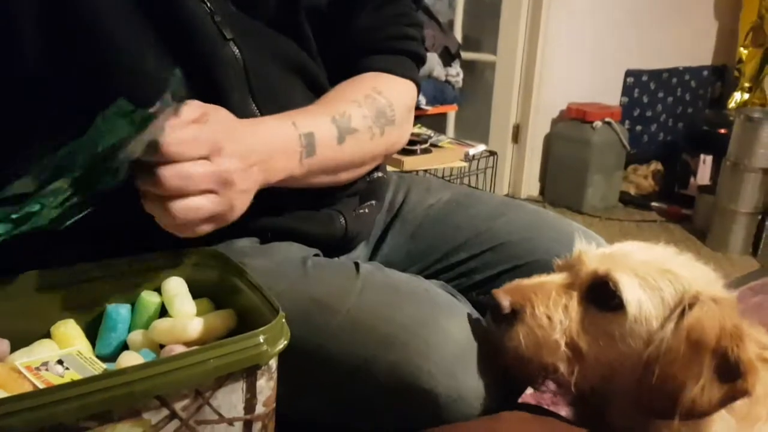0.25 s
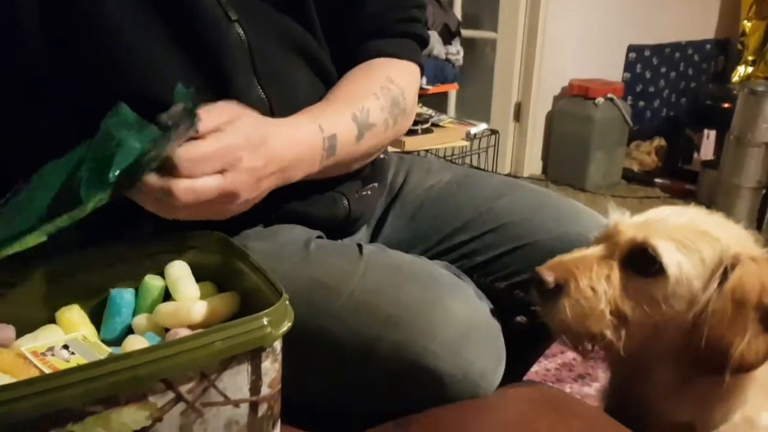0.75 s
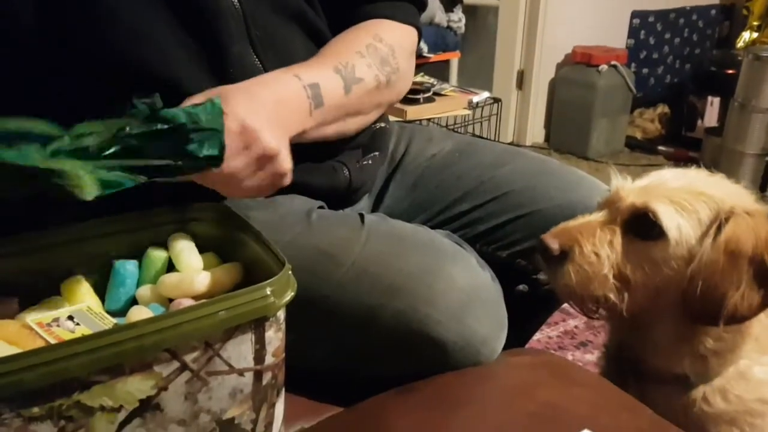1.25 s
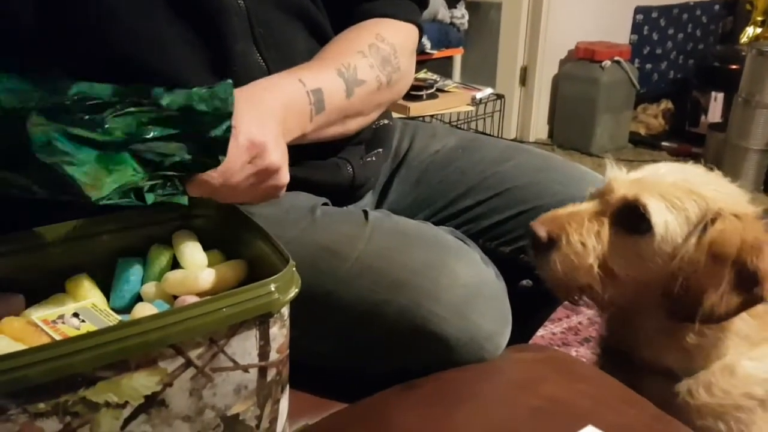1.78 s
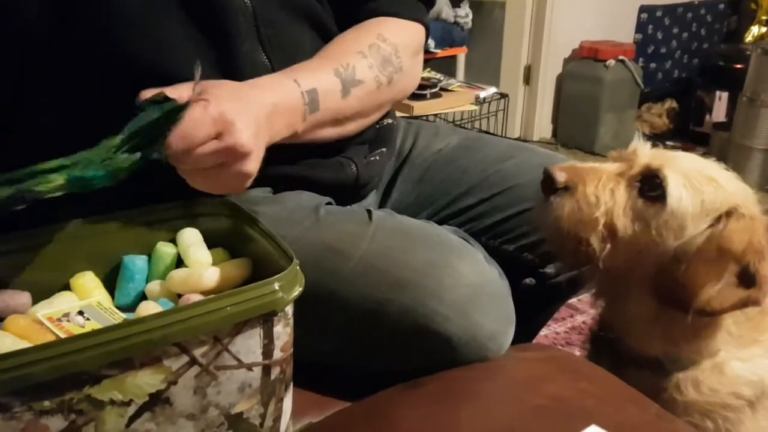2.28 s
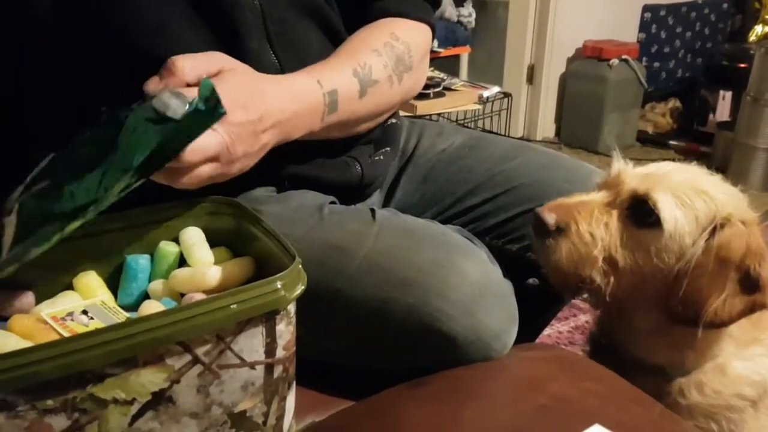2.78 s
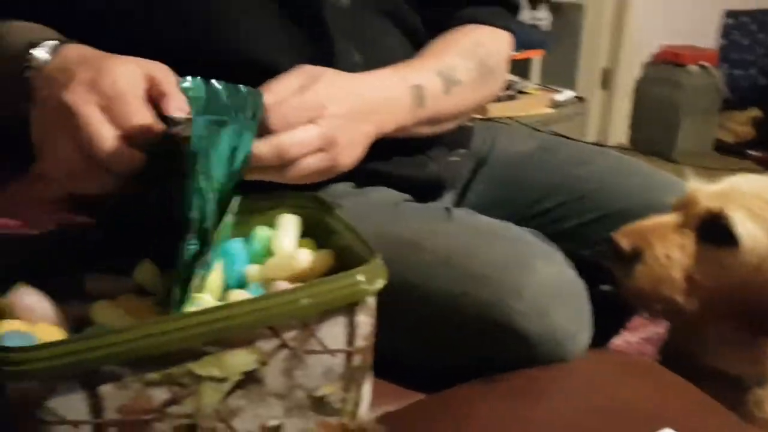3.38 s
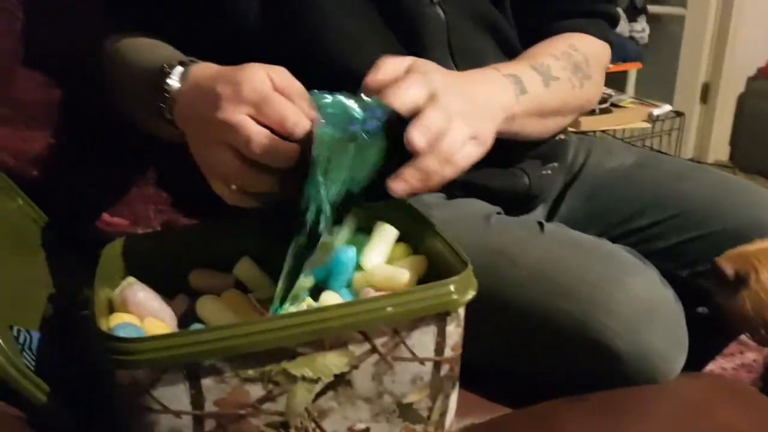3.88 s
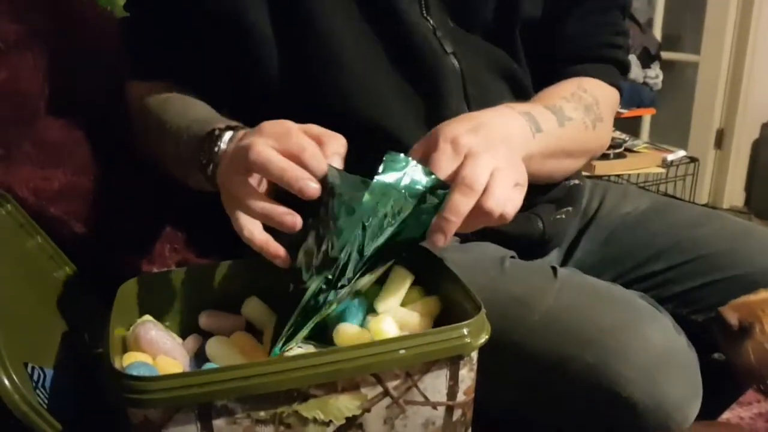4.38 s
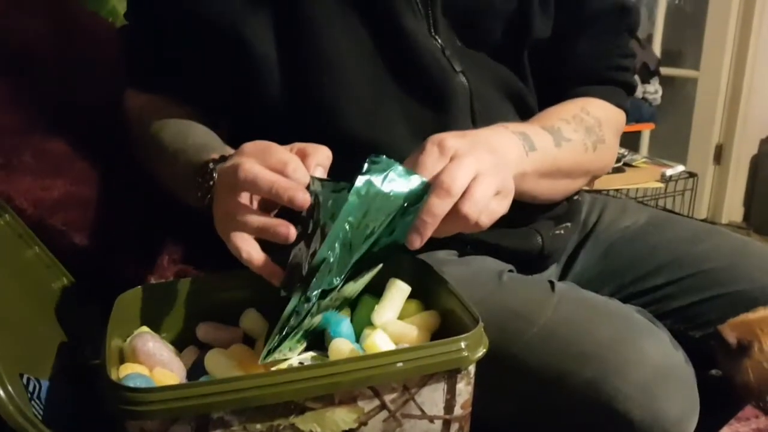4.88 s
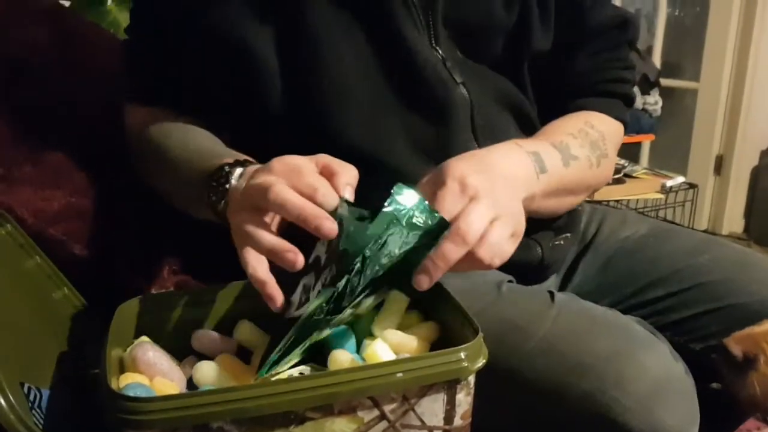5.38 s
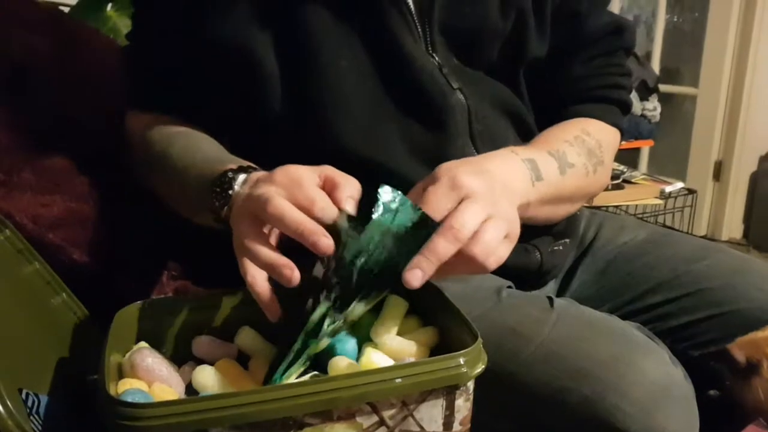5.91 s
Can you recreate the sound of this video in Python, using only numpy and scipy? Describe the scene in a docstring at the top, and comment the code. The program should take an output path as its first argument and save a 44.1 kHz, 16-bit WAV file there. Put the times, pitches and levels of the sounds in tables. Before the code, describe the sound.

Dry, bright foil crinkling, close and slightly left, in a furnished room with a short soft echo. Separate ticks and gaps lead to denser snapping and a hard, almost overloaded crack with a quick rub of foil. Clusters of crackles and soft puffs of pumped air continue, become sparse, then a fresh rustle closes it. The phone microphone adds only a faint hush.

```python
"""A foil bag is pulled open by hand, an arm's length from a two-port phone in a small furnished room.
It starts with small scattered snaps, builds to the loudest burst near 2.45 s, thins out from 4.7 s and
stirs again near 6 s. Each snap is a buckling crease that rings a patch of foil; aftershocks and crackle
fill the gaps, filtered noise makes the rubbing and pumped air, dull knocks ring the walls, and the room
answers with a short tail of decaying noise. A treble sheen and a faint low hush lie below."""
import sys
import numpy as np
from scipy import signal
from scipy.fft import rfft, irfft, next_fast_len
from scipy.io import wavfile
from scipy.ndimage import uniform_filter1d

SR = 44100
rng = np.random.default_rng(int(sys.argv[2]) if len(sys.argv) > 2 else 0)


def generate_wav(signal):
    """Clip the signal to [-1, 1] and save it as 16-bit WAV at the path in sys.argv[1]."""
    frames = np.transpose(np.atleast_2d(signal))
    scaled = np.clip(frames, -1, 1) * 32767
    pcm = np.round(scaled).astype(np.int16)
    wavfile.write(sys.argv[1], SR, pcm)


N = 271117  # length in samples

# All source levels are ahead of the microphone; colours hold their end values beyond the first and last Hz.
# Buckling creases. Each row: time in seconds, nominal peak in dB, patch pitch in Hz, relative treble
# in dB, sharpness of ring as Q (held to 0.5 or more).
SNAPS = [(0.121, -36.5, 3490, -13, 1.7), (0.1596, -32, 2460, -26, 2.4), (0.169, -36.5, 3000, -30, 2.7),
         (0.19, -26.5, 4450, 0, 2.5), (0.316, -37, 3530, -35, 5.5), (0.323, -40.5, 3970, -25, 2),
         (0.356, -34, 4870, -4, 6.3), (0.398, -39.5, 2480, -26, 2.9), (0.456, -27, 3850, -24, 0.62),
         (0.4745, -19, 9100, 3, 2.7), (0.504, -29.5, 5030, -13, 5.4), (0.529, -34.5, 4040, -9, 3.3),
         (0.5622, -30, 3420, -17, 0.6), (0.5715, -33.5, 4960, -9, 2), (0.746, -34.5, 4260, -46, 3.7),
         (0.7744, -24.5, 2060, -16.5, 1), (1.0971, -28, 2250, -22, 0.41), (1.1896, -25.5, 4770, -3, 1.4),
         (1.2438, -13, 4180, 2, 3.5), (1.327, -32.5, 3300, -24, 3.7), (1.337, -29.5, 3070, -17.5, 13),
         (1.3785, -26, 2850, -27, 0.77), (1.399, -31, 2650, -16, 3.5), (1.4587, -33, 3360, 2, 2.6),
         (1.4656, -23.5, 2860, -16, 3.1), (1.47, -38, 3300, -25, 4), (1.4798, -17, 2980, -31, 1.2),
         (1.5513, -37.5, 3500, -16, 8.2), (1.5988, -31.5, 3640, -10.5, 3.5), (1.6355, -32, 3230, -18, 5.7),
         (1.6819, -31, 2040, -23.5, 4.9), (1.721, -41, 2520, -26, 7.4), (1.7601, -23, 2600, -30, 15),
         (1.767, -17.5, 4960, -12, 2), (1.8257, -23.5, 2600, -17, 0.76), (1.964, -29, 5200, -6, 5.1),
         (2.015, -17.5, 3420, -16, 0.87), (2.0569, -25, 2700, -39, 9.3), (2.1005, -10.5, 5030, -19, 8.4),
         (2.114, -15.5, 4470, -11, 6.4), (2.1672, -23, 2350, -33.5, 3.4), (2.1781, -16.5, 2820, -16, 1.5),
         (2.205, -20, 5000, -17, 4.3), (2.2459, -25, 2330, -32, 8), (2.2698, -18.5, 2430, -15, 0.36),
         (2.32, -20, 5600, -8, 9), (2.3404, -47, 3430, -14.5, 3.2), (2.3669, -23.5, 2650, -16, 2.2),
         (2.413, -23, 3460, -12, 3.8), (2.42, -14, 3040, -7, 3.2), (2.4393, -3.5, 3530, -8, 0.6),
         (2.445, -7, 3470, -23, 2.4), (2.4522, 0, 5150, -14, 3.5), (2.461, 4, 3500, 0.5, 2),
         (2.4745, -7, 2363, -20, 6.2), (2.59, -24.5, 3300, -12, 3.4), (2.654, -31.5, 3440, -26, 0.68),
         (2.6922, -32, 2340, -8, 1.1), (2.7, -30.5, 2760, -39, 2.6), (2.7331, -23, 6000, -30, 42),
         (2.8748, -19.5, 3600, -8, 4.9), (2.9073, -17, 2600, -13.5, 1.7), (2.9944, -27, 5250.0, 13, 6.6),
         (3.0221, -26, 3830, -5, 6), (3.0421, -19.5, 3680, -5.5, 3), (3.071, -21, 2750, -6, 4.1),
         (3.0851, -22, 2250, -10, 0.58), (3.203, -39, 4560, -10, 2), (3.307, -33, 3100, -20, 0.46),
         (3.3433, -32, 1470, -30, 4.1), (3.37, -26, 1950, -9.5, 3.6), (3.387, -25, 2180, -12, 1.7),
         (3.4692, -28, 1500, -17.5, 0.39), (3.6109, -38, 810, -40.5, 1.5), (3.712, -34, 4230, -1, 4.9),
         (3.7459, -12.5, 4430, -5.5, 3.3), (3.8608, -22.5, 1910, -14, 5.3), (3.912, -15, 4000, -10, 6.8),
         (4.0354, -35.5, 3610, -35, 18), (4.0679, -23.5, 1420, -15, 0.72), (4.1452, -25.5, 507, -19.5, 12),
         (4.198, -35, 3900, -30, 3.5), (4.288, -13, 2020, -13.5, 5), (4.288, -18.5, 3980, -15.5, 4.8),
         (4.3569, -26.5, 2380, -36, 2.5), (4.3742, -20.5, 3280, -16, 1.3), (4.3874, -19, 1290, -44, 2.4),
         (4.3945, -17.5, 5030, -23, 1.6), (4.469, -33, 3100, -23, 2), (4.4856, -13.5, 3570, -5.5, 0.43),
         (4.494, -18.5, 3560, -11, 1.6), (4.569, -38, 3080, -16, 3), (4.688, -41, 800, -31, 1.5),
         (4.7032, -13.5, 3480, -10.5, 3.8), (4.994, -20, 5160, -1.5, 10), (5.0778, -34, 590, -21, 3.4),
         (5.1186, -36.5, 1310, -35, 3.4), (5.2751, -36, 4070, -5, 4.9), (5.463, -37, 2300, -28, 3),
         (5.5345, -22, 2570, -14.5, 0.41), (5.538, -34.5, 1700, -41, 1.9), (5.9065, -36.5, 2170, -27, 3.8),
         (5.961, -17.5, 3220, -26, 1.3), (5.9961, -14, 2110, -9, 4.8), (6.035, -13.5, 3750, -16, 0.87),
         (6.0587, -20, 3400, -38, 0.57), (6.084, -19, 2540, -11.5, 1.6), (6.1208, -29, 4200, -25, 7.7)]
# A snap sets off a weaker crease nearby: time scale in s, mean level re the snap and spread either way in dB.
AFTER_S, AFTER_DB, AFTER_SPREAD_DB = 0.016, -16, 5
GRAIN = 768  # samples in one crease sound
RARE = 0.015  # share of the very largest small creases that never happen

# Blows of the bag on hands and box. Each row: time in seconds, nominal peak in dB, pitch in Hz.
KNOCKS = [(0.156, -43, 423), (1.336, -43.5, 510), (1.632, -47.5, 670), (1.821, -35.5, 230),
          (1.834, -43, 650), (2.116, -31, 1160), (2.317, -34, 1090), (2.468, -37, 1100), (2.914, -37, 208),
          (3.085, -41.5, 288), (3.921, -30.5, 740), (4.143, -39.5, 464), (4.358, -36.5, 377),
          (4.376, -39.5, 313), (4.403, -39, 414), (4.593, -42, 680), (4.9, -52, 673), (4.95, -54, 650),
          (5.112, -45.5, 394), (5.176, -50.5, 444), (5.452, -45.5, 686), (5.492, -45, 596),
          (5.955, -34, 416), (5.993, -33.5, 870)]
# A snap of a 3 kHz patch jolts the walls this far below its own peak; small, high patches jolt them less.
JOLT_DB, JOLT_DB_PER_OCTAVE = -24.5, -4
JOLT_LOW_HZ, JOLT_OCTAVES = 387, 1.8  # lowest wall pitch, and the range above it

# Steady working of the foil. Each row: time in seconds, nominal foil rubbing in dB, pumped air in dB.
HANDS = [(0.0, -61.5, -77), (0.121, -77.5, -75), (0.3, -61.5, -68.5), (0.7, -77.5, -91.5),
         (1.0, -115, -100), (1.105, -59, -72.5), (1.28, -63.5, -68.5), (1.64, -62.5, -74.5),
         (1.97, -81, -74), (2.2, -51, -60.5), (2.4, -50, -65.5), (2.79, -65.5, -75.5), (2.865, -67.5, -72),
         (2.959, -52.5, -54), (3.29, -68, -77.5), (3.6, -70.5, -71.5), (3.63, -66, -69.5),
         (3.934, -39, -52.5), (4.23, -81.5, -63), (4.761, -75, -67), (5.408, -77, -75.5),
         (5.901, -78.5, -69), (6.15, -42.5, -56.5)]
# Quick tugs. Each row: time in seconds when the rubbing peaks, seconds held, nominal foil rubbing peak
# in dB, pumped air peak in dB.
TUGS = [(0.456, 0.0045, -54, -68), (0.776, 0.0042, -65, -64), (1.454, 0.006, -48, -73),
        (1.816, 0.0044, -55.5, -56.5), (2.05, 0.0064, -59, -67), (2.442, 0.044, -28.5, -46),
        (3.347, 0.043, -53.5, -61.5), (3.76, 0.15, -67, -82), (4.147, 0.047, -53.5, -81),
        (4.376, 0.015, -43, -53), (4.599, 0.025, -62.5, -60), (5.116, 0.0088, -63, -63),
        (5.44, 0.1, -59, -56.5), (5.908, 0.099, -52.5, -53), (5.97, 0.096, -56, -54),
        (6.044, 0.032, -41.5, -57.5)]
TUG_RISE_DB_S, TUG_FALL_DB_S, AIR_RISE_DB_S = 1499, 196.5, 147.5
TREBLE_DB, TREBLE_PER_DB = 1, 0.15  # relative treble at -49 dB of rubbing, and its change per dB of rubbing
# Body of the foil rubbing. Each row: frequency in Hz, relative level in dB.
RUB = [(700, -16.5), (1500, -8), (2500, -5), (4500, -4.5), (7000, -13.5), (9000, -26)]
# Treble of the foil rubbing. Each row: frequency in Hz, relative level in dB.
RUB_TOP = [(4500, -36.5), (7500, 0.5), (12000, -3)]
# Flexing bag walls. Each row: frequency in Hz, relative level in dB per Hz.
WALLS = [(150, -27), (250, 6.5), (817, -5), (1090, -8.5), (1500, -16.5), (1950, -40.5), (3300, -120)]
# Air pumped in the bag. Each row: frequency in Hz, relative level in dB per Hz.
AIR = [(15, -58.5), (60, -8), (140, 5.5), (224, 0), (260, -22), (340, -46.5), (570, -120)]

# Where the bag is. Each row: time in seconds, samples the left port leads, left minus right level in dB.
PLACE = [(0, 10, 3.5), (1.25, 9.4, 2.5), (1.75, 10.3, 6), (2.6, 13.9, 2), (3.3, 11, 3.5), (3.6, 2.25, 1.5),
         (6.15, 2.46, 3.5)]
# Decay of the room. Each row: frequency in Hz, seconds to fall by 60 dB.
ROOM_T60_S = [(200, 0.073), (1000, 0.24), (4000, 0.19), (12000, 0.21)]
# Smooth treble hiss under everything. Each row: time in seconds, level in dB.
SHEEN = [(0, -86), (0.85, -72), (1.0, -103), (1.2, -62.5), (4.5, -67.5), (5.5, -60), (5.68, -66.5),
         (5.75, -56.5), (5.83, -67.5), (6.15, -80)]
# Colour of that hiss. Each row: frequency in Hz, relative level in dB per Hz.
SHEEN_COLOUR = [(1500, -31.5), (3500, -9), (5000, -3.5), (8000, -4), (14000, -3)]
# Colour of the faint steady background. Each row: frequency in Hz, relative level in dB per Hz.
HUSH = [(18, -36), (30, -6), (75, -8), (113, 1), (167, -15), (497, -29), (1200, -26), (1830, -30),
        (15000, -32)]
HUSH_DB = -81  # rms
# Microphone response. Each row: frequency in Hz, gain in dB.
MIC = [(30, 9), (150, 1), (500, 0.5), (1500, 3.5), (3000, 3), (6000, 1), (9000, -5.5), (12500, -2),
       (14400, -7), (14900, -22.5), (15600, -42.5)]
TOP_HZ = 15671  # the sound is cut steeply above this


def undb(db):
    """Decibels to amplitude."""
    return 10 ** (np.asarray(db) / 20)


def level(x, db):
    """Scale a signal to an rms level in dB."""
    return x * undb(db) / np.sqrt(np.mean(x ** 2))


def track(table, s):
    """Columns of a time table read at the times s."""
    t, *columns = np.transpose(table)
    return [np.interp(s, t, c) for c in columns]


def colour(x, points):
    """Shape a long signal by (Hz, dB) points, joined along a logarithmic frequency scale."""
    size = next_fast_len(x.shape[-1])
    hz, db = np.transpose(points)
    f = np.maximum(np.fft.rfftfreq(size, 1 / SR), 1)
    gain = undb(np.interp(np.log(f), np.log(hz), db))
    return irfft(rfft(x, size) * gain, size)[..., :x.shape[-1]]


def ring(f, hz, q):
    """Response of a damped resonator, gain 1 at its centre."""
    return 1 / (1 + 1j * q * (f / hz - hz / f))


def walk(rate):
    """Random levels held 1 / rate s and slewed; spread a little under 1."""
    hold = int(SR / rate)
    steps = np.repeat(rng.standard_normal(N // hold + 1), hold)
    return uniform_filter1d(steps, hold)[:N]


def snaps():
    """The main creases: each buckles at its own moment and rings its own patch of foil."""
    return creases(*np.transpose(SNAPS))


def creases(s, peak_db, hz, treble_db, q, crack_db=-9, slip_s=0.00044, alike=0.16, focus=0.14):
    """A crease lets go: the jolt rings its patch and two neighbours, the tearing slip cracks and rattles out.
    Rows: left port, right port, and the blend of all directions that reaches the walls."""
    t = np.arange(GRAIN) / SR
    f = np.fft.rfftfreq(GRAIN, 1 / SR)[None] + 1
    hz, q, treble_db = (np.asarray(c)[:, None] for c in (hz, np.clip(q, 0.5, 60), treble_db))
    chance = rng.standard_normal((len(s), 3, GRAIN))
    neighbours = undb(-4) / (1 + (q / 12) ** 2)  # a clear ring leaves its neighbours still
    patch, blend = foil_rings(f, hz, q, neighbours, chance[:, :2, -1:], focus)
    crack = undb(crack_db + 3) * neighbours * ring(f, 3800, 0.52) ** 2
    crack = crack + undb(treble_db + 12) * ring(f, 11700, 0.44) ** 2

    # a short slip, then a weaker rattle
    slip = (t / slip_s) * np.exp(-t / slip_s) + undb(-22) * np.exp(-t / 0.003)
    jolt = np.sqrt(np.sum(slip ** 2))
    grains = []
    for port in range(2):
        # the two ports face different parts of the crumpled sheet
        tear = alike * chance[:, 0] + np.sqrt(max(1 - alike ** 2, 0)) * chance[:, 1 + port]
        tear = rfft(tear * slip)
        grains.append(irfft((jolt + 1.43 * tear) * patch + tear * crack))
    grains.append(irfft((jolt + 1.43 * jolt) * blend + jolt * crack))

    # the peak is set on the mean of the two ports
    scale = undb(peak_db - 1.5) / np.abs(grains[0] + grains[1]).max(axis=1) * 2
    lead, pan_db = track(PLACE, s)
    out = np.zeros((3, N + GRAIN))
    for row, side in enumerate((1, -1, 0)):
        grain = grains[row] * (scale * undb(side * pan_db / 2))[:, None]
        start = np.round(s * SR - side * lead / 2 - slip_s * SR)
        start = np.clip(start, 0, N).astype(int)
        np.add.at(out[row], start[:, None] + np.arange(GRAIN), grain)
    return out[:, :N]


def foil_rings(f, hz, q, neighbours, detune, focus):
    """Responses of a patch and two detuned neighbours: toward the ports, and blended over all directions."""
    patch = np.sqrt(q / 3) * ring(f, hz, q)
    blend = np.sqrt(np.minimum(q, 18) / 6) * ring(f, hz, q * (1 - neighbours))
    for k in range(2):
        near_hz = np.clip(hz * np.exp(0.662 * detune[:, k]), 150, 9000)
        patch = patch + neighbours * ring(f, near_hz, 11)
        # summed over all directions the rings smear into a broad colour
        blend = blend + neighbours / 2 * ring(f, near_hz, 2.5)
    # a small patch radiates poorly far from its own pitch
    radiation = ring(f, hz, focus)
    return patch * radiation, blend * radiation


def aftershocks():
    """Each snap unloads the foil onto a neighbouring crease, which gives way a moment later."""
    s, peak_db, hz, treble_db, q = np.transpose(SNAPS)
    late, size, pitch = rng.random((len(s), 3)).T
    after_s = s + AFTER_S * (0.29 + 0.75 * late)
    after_db = peak_db + AFTER_DB + AFTER_SPREAD_DB * (2 * size - 1)
    after_hz = np.clip(hz * 2 ** (1.2 * pitch - 0.6), 400, 9000)
    return creases(after_s, after_db, after_hz, treble_db, 2.0 + 0 * s)


def crackle(count=2600):
    """Small creases at random moments; they stand out more the harder the foil is worked."""
    when, size, pitch = rng.random((count, 3)).T
    s = when * N / SR
    rub_db, treble_db, _ = effort(s)
    # many small creases and a few large ones
    size_db = -5.5 * np.log(1 - size * (1 - RARE))
    peak_db = rub_db - 4 + 0.2 * (rub_db + 46) + size_db
    return creases(s, peak_db, 700 * 2 ** (3 * pitch), treble_db - 16.5, 6.4 + 0 * s)


def handling():
    """Foil slides on foil and skin; lower down the walls flex with both the rubbing and the pumped air."""
    s = np.arange(0, N + 64, 64) / SR  # effort is read every 64 samples
    rub_db, treble_db, air_db = (np.interp(np.arange(N) / SR, s, db) for db in effort(s))
    rub = hiss(RUB, rub_db - 2, side=0.99, flicker_db=4.8, rate=120)
    rub = rub + hiss(RUB_TOP, rub_db + treble_db, side=0.93, flicker_db=5.1, rate=170)
    walls = hiss(WALLS, (rub_db + air_db) / 2, side=0.3, flicker_db=4.0, rate=60)
    air = hiss(AIR, air_db, side=0.14, flicker_db=3.5, rate=33)
    return rub + walls + air


def effort(s):
    """Rubbing, treble and air dB at the times s: the steady working plus tugs that rise fast, hold and die away."""
    at, held, rub_peak, air_peak = np.transpose(TUGS)[:, :, None]
    fall = TUG_FALL_DB_S * np.maximum(s - at - held, 0)
    rub_tug = rub_peak + TUG_RISE_DB_S * np.minimum(s - at, 0) - fall
    # the air builds up while the tug is held
    air_tug = rub_tug - rub_peak + air_peak + AIR_RISE_DB_S * np.clip(s - at - held, -held, 0)
    rub_steady, air_steady = track(HANDS, s)
    rub_db = add_powers(rub_steady, rub_tug)
    air_db = add_powers(air_steady, air_tug)
    return rub_db, TREBLE_DB + TREBLE_PER_DB * (rub_db + 49), air_db


def add_powers(steady_db, tugs_db):
    """Level in dB of a steady sound and all tugs together, their powers adding."""
    return 10 * np.log10(undb(2 * steady_db) + np.sum(undb(2 * tugs_db), axis=0))


def hiss(points, db, side, flicker_db, rate):
    """Coloured noise with a shared and an opposed part, flickering in level, panned by level like the bag."""
    mid, apart = colour(rng.standard_normal((2, N)), points)
    stereo = level(mid + side * apart * np.array([[1], [-1]]), 0)
    pan_db = track(PLACE, np.arange(N) / SR)[1] * np.array([[0.5], [-0.5]])
    return stereo * undb(db + pan_db + flicker_db * walk(rate))


def knocks():
    """Soft blows, and the jolt of every snap, ring the bag walls low and dull."""
    s, peak_db, hz = np.transpose(KNOCKS)
    # a hand presses for longer than a crease snaps
    blows = creases(s, peak_db, hz, -60 + 0 * s, 5.5 + 0 * s,
                    crack_db=-30.5, slip_s=0.003, alike=0.89, focus=0.61)
    snap_s, snap_db, snap_hz = np.transpose(SNAPS)[:3]
    jolt_db = snap_db + JOLT_DB + JOLT_DB_PER_OCTAVE * np.log2(snap_hz / 3000)
    jolt_hz = JOLT_LOW_HZ * 2 ** (JOLT_OCTAVES * rng.random(len(snap_s)))
    jolts = creases(snap_s, jolt_db, jolt_hz, -45 + 0 * snap_s, 4.8 + 0 * snap_s, crack_db=-23, alike=0.7)
    return blows + jolts


def room(dry, wet_db=-8, first_s=0.0055):
    """Dense reflections from a first wall onward, each octave dying at its own rate."""
    t = np.arange(SR // 2) / SR
    hz, t60 = np.transpose(ROOM_T60_S)
    tail = 0
    for f in 125 * 2.0 ** np.arange(8):
        octave = [(f / 2, -40), (f / 1.8, -3), (f, 0), (f * 1.3, -3), (f * 2, -40)]
        band = colour(rng.standard_normal((2, len(t))), octave)
        tail = tail + band * undb(-60 * t / np.interp(np.log(f), np.log(hz), t60))
    # lap and box scatter a little before the first wall answers
    tail = tail * np.clip((t - first_s) / 0.0007, 0.3, 1)
    tail *= undb(wet_db) / np.sqrt(np.sum(tail ** 2, axis=1, keepdims=True))
    return signal.fftconvolve(dry, tail, axes=1)[:, :N]


def sheen():
    """A smooth treble hiss whose level follows SHEEN, with a dip near 1 s and a brief swell near 5.75 s."""
    db = track(SHEEN, np.arange(N) / SR)[0]
    return hiss(SHEEN_COLOUR, db, side=0.9, flicker_db=0.7, rate=12)


def hush():
    """Faint steady noise, mostly low, independent at the two ports."""
    return level(colour(rng.standard_normal((2, N)), HUSH), HUSH_DB)


def scene():
    """The bag straight to the two ports, its handling, the room's answer and the background."""
    bag = snaps() + aftershocks() + crackle() + knocks()
    direct, to_walls = bag[:2], bag[2:]
    return direct + handling() + room(to_walls) + sheen() + hush()


def record(dry):
    """Microphone colour, soft overload that rounds the loudest peaks, then a steep cut at the top."""
    heard = np.tanh(1.07 * colour(dry, MIC))
    steep = signal.ellip(12, 0.2, 100, TOP_HZ, fs=SR, output="sos")
    return 0.9 * signal.sosfilt(steep, heard)


dry = scene()
out = record(dry)
generate_wav(out)
```